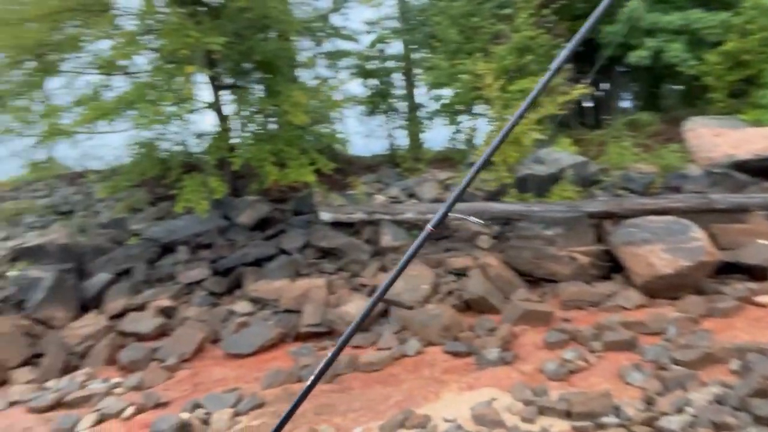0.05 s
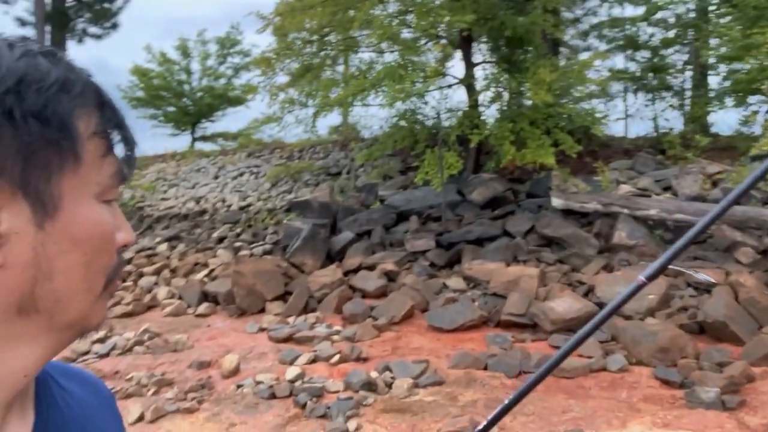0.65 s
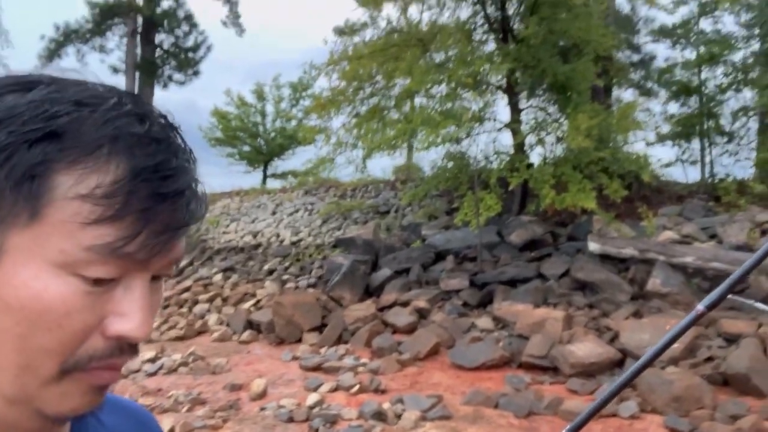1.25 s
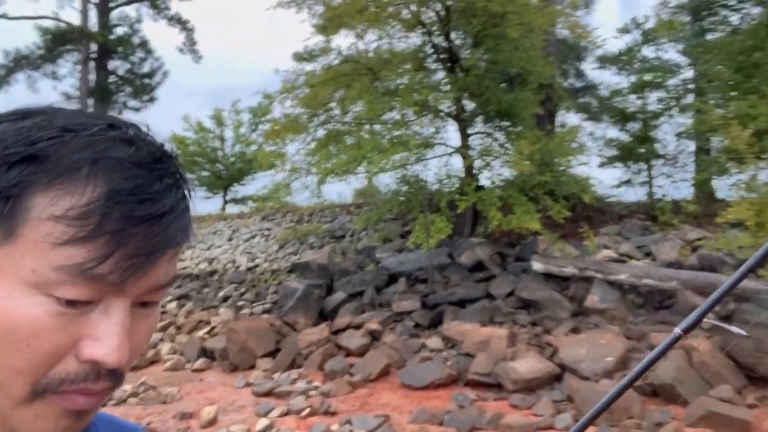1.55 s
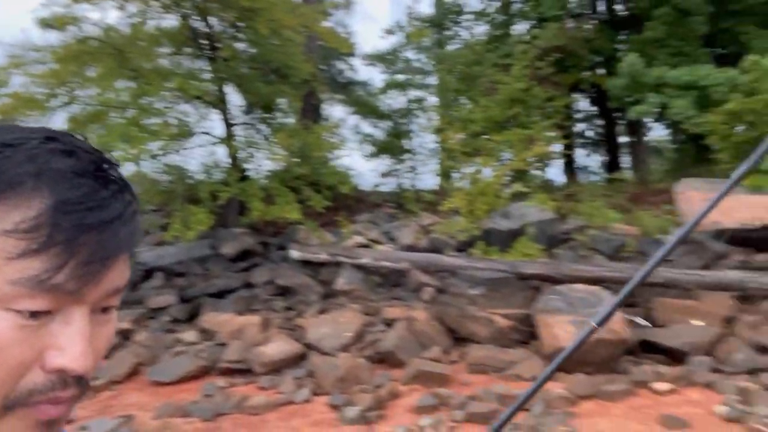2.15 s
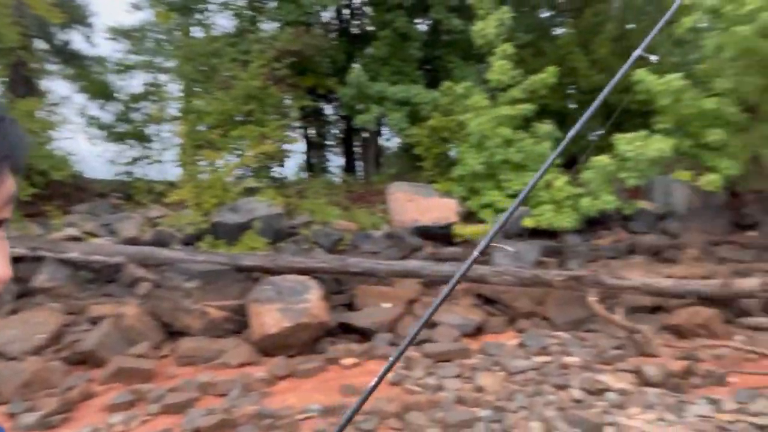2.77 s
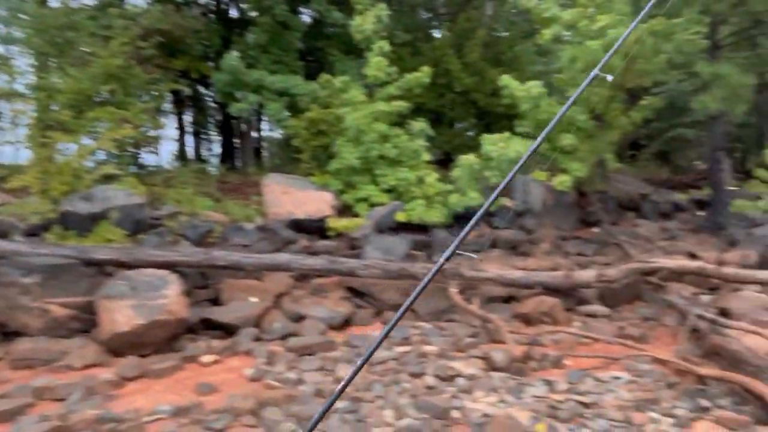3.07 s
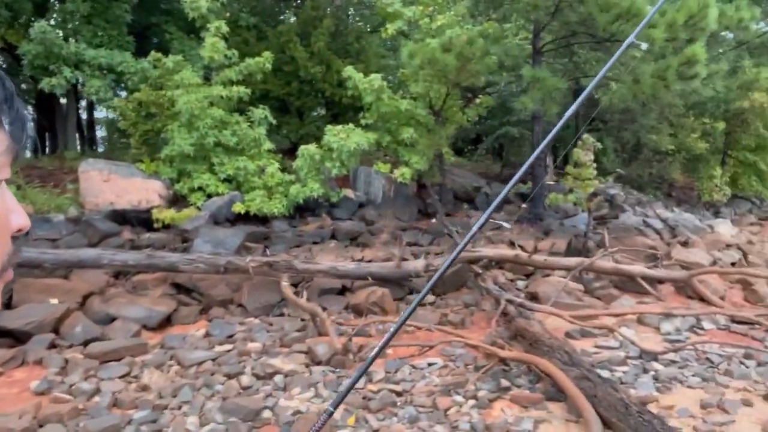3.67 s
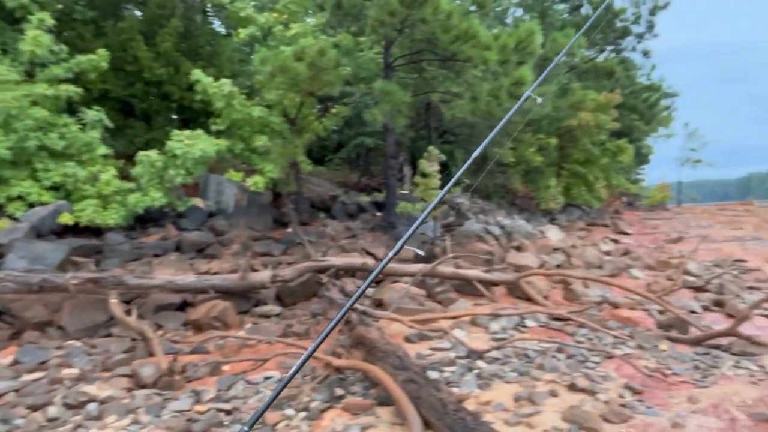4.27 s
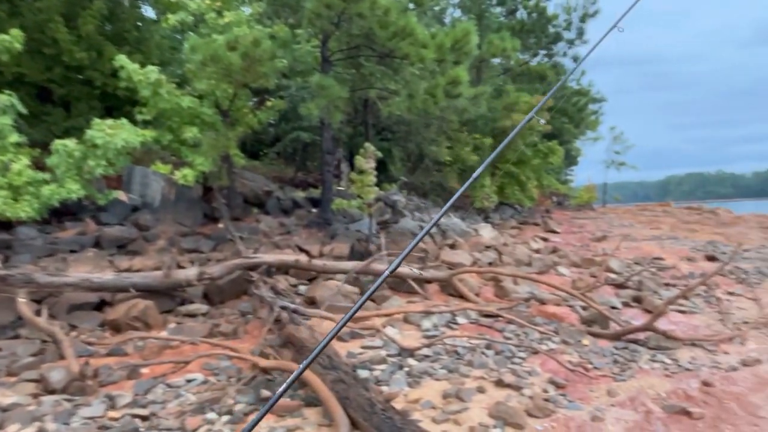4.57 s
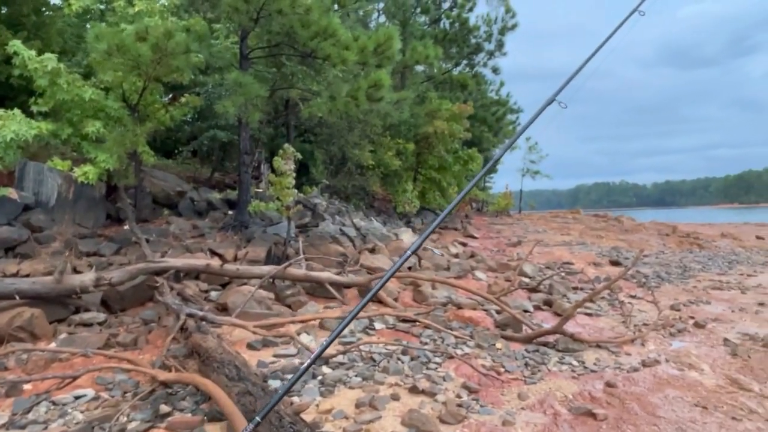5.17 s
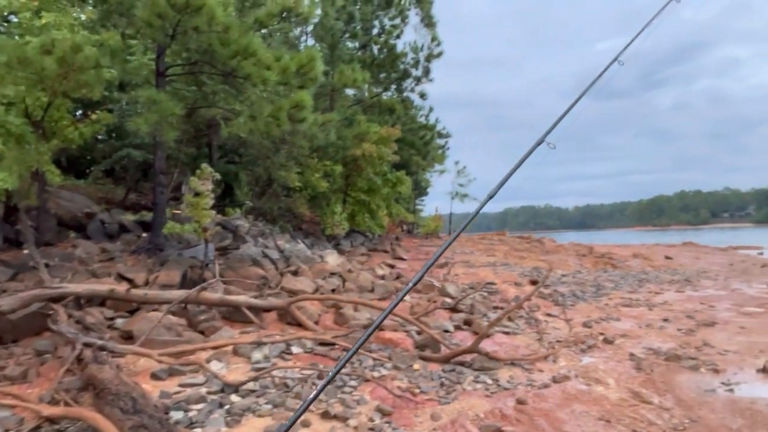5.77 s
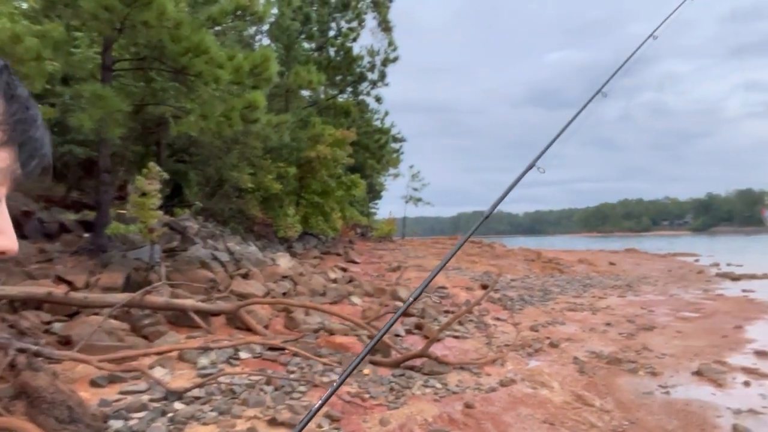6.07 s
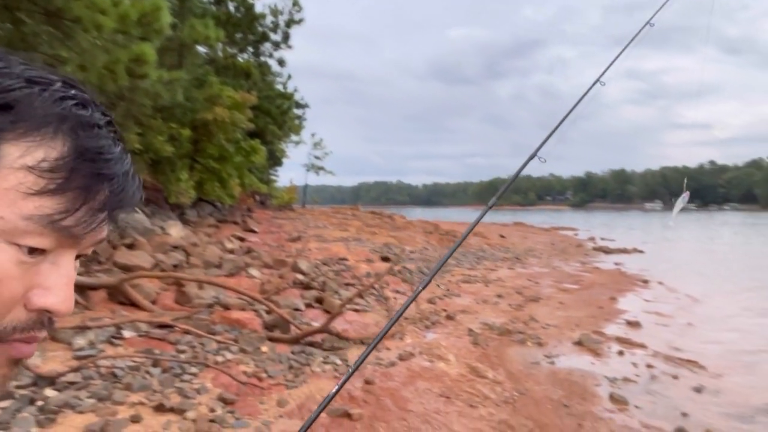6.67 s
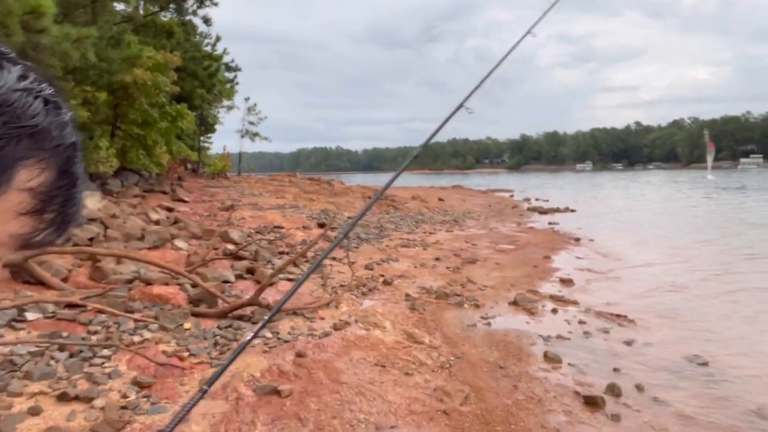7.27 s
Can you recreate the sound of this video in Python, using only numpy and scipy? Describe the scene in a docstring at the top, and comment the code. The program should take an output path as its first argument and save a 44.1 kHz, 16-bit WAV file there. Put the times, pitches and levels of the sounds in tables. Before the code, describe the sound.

Wind buffets the microphone as someone walks slowly over a stony lakeshore, while small waves gurgle and crickets trill.

```python
"""Slow steps crunch along a stony lakeshore: gravel and sand give way in many tiny impacts, and loose
stones clack with a short, damped ring. Wavelets gurgle at the edge as their bubbles resonate.
Two crickets trill by stridulation, a chorus behind them; their phase between the microphone's two
ports shifts as it slowly turns. Wind rumbles on the microphone over the low harmonic throb of a far
engine, probably a boat."""
import sys
import numpy as np
from scipy import signal
from scipy.fft import rfft, irfft, next_fast_len
from scipy.io import wavfile
from scipy.ndimage import uniform_filter1d, map_coordinates

SR = 44100
rng = np.random.default_rng(int(sys.argv[2]) if len(sys.argv) > 2 else 0)


def master_out(mix):
    """Clip the mix to full scale and print it as 16-bit PCM to the path in sys.argv[1]."""
    frames = np.transpose(np.atleast_2d(mix))
    ceiling = np.clip(frames, -1, 1)
    pcm = np.round(ceiling * 32767).astype(np.int16)
    wavfile.write(sys.argv[1], SR, pcm)


N = 322812
TOP_HZ = 15850
SIDE = np.array([[.5], [-.5]])  # splits a difference between left and right

# soles pressing into gravel: start_s, rise_s, length_s, gravel_db, grit_db
FOOTFALLS = [(0.339, 0.0031, 0.094, -42.5, -47.5), (0.444, 0.0089, 0.039, -47, -60),
             (0.522, 0.013, 0.06, -53.5, -53.5), (0.932, 0.0086, 0.063, -36, -39),
             (1.045, 0.0055, 0.14, -44, -48.5), (1.686, 0.021, 0.13, -40.5, -50.5),
             (1.87, 0.022, 0.06, -62, -48), (2.265, 0.0046, 0.062, -49, -59),
             (2.345, 0.017, 0.036, -36, -47), (2.471, 0.02, 0.059, -43, -60),
             (2.668, 0.028, 0.089, -53, -52.5), (3.077, 0.032, 0.098, -33.5, -43.5),
             (3.153, 0.026, 0.034, -37.5, -46), (3.762, 0.012, 0.1, -46.5, -53.5),
             (3.933, 0.009, 0.021, -39, -53), (4.391, 0.025, 0.062, -38, -45.5),
             (4.751, 0.019, 0.11, -49.5, -69), (5.419, 0.037, 0.051, -40, -34.5),
             (5.602, .005, 0.026, -44, -54.5), (6.683, 0.013, 0.074, -44.5, -58)]
# soles sliding on sand: start_s, length_s, level_db
SCUFFS = [(0.326, 0.031, -47), (0.461, 0.016, -36.5), (0.934, 0.17, -48.5), (1.724, 0.025, -34.5),
          (2.355, 0.023, -29.5), (3.07, 0.063, -38), (3.793, 0.027, -36.5), (3.916, 0.037, -43.5),
          (4.42, 0.016, -44), (4.653, 0.022, -42.5), (4.775, 0.021, -51), (5.517, 0.068, -39),
          (6.322, 0.035, -44), (6.415, 0.023, -33), (6.686, 0.046, -41.5)]
# spectra of coarse gravel and fine grit: frequency_hz, density_db
GRAVEL_SPECTRUM = [(200, 3), (450, -4), (750, 4.5), (1100, 7), (1700, 0), (2300, -6), (2900, -5),
                   (4200, -10), (6000, -3), (9000, -2), (16000, -103)]
GRIT_SPECTRUM = [(600, -14), (1600, -1.5), (2700, 5.5), (3800, 0.5), (6000, -12), (12000, -25)]
# spectrum of hissing sand, and of foam on the water: frequency_hz, density_db
HISS_SPECTRUM = [(1500, -24), (3500, -9), (5500, -5.5), (7500, 0), (8500, 0), (9500, -7), (12000, -9),
                 (14000, -5), (16000, -7)]
def steps():
    """Granular noise: under a sole, countless impacts merge into a crunch and friction into a hiss."""
    gravel, grit, sand = np.zeros((3, N))
    t = np.arange(SR // 2) / SR
    for start, rise, length, gravel_db, grit_db in FOOTFALLS:
        force = sole_force(t, rise, length)
        add(gravel, start, amp(gravel_db) * force)
        add(grit, start, amp(grit_db) * force)
    for start, length, db in SCUFFS:
        add(sand, start, amp(db) * sole_force(t, rise=.46 * length, length=length))
    clicks = amp(-6.5) * pebbles(centre_hz=1250, octaves=1, cycles=9, size_db=11, count=2600)
    coarse = spread(patchy(crackle(clump_db=3.6), depth_db=3), GRAVEL_SPECTRUM)
    fine = spread(crackle(clump_db=3.5), GRIT_SPECTRUM)
    chips = pebbles(centre_hz=2850, octaves=.45, cycles=13, size_db=12, count=2400)
    crunch = gravel * unit(coarse + clicks) + grit * unit(fine + chips)
    fits = unit(amp(1.4 * wobble(110)))  # the stones give way in fits and starts
    return fits * crunch + sand * spread(crackle(clump_db=3.5), HISS_SPECTRUM)


def sole_force(t, rise, length):
    """Loading and relaxation: the force builds up, holds and dies away as the foot settles."""
    return (1 - np.exp(-t / rise)) ** 2 / (1 + (t / length) ** 2.61)


def pebbles(centre_hz, octaves, cycles, size_db, count):
    """Damped oscillators: each struck pebble clicks at its own pitch, size and side; rms 1."""
    when, pitch, size, pan = np.hsplit(rng.random((count, 4)), 4)
    t = np.arange(400) / SR
    hz = np.minimum(centre_hz * 2 ** (octaves * (2 * pitch - 1)), TOP_HZ)
    envelope = amp(size_db * size ** 2 - 60 * t * hz / cycles) / np.sqrt(hz)
    return scatter(envelope * np.sin(2 * np.pi * hz * t), when, pan)


# grit snapping underfoot: start_s, level_db, pitch_hz
GRIT_SNAPS = [(0.485, -29, 8250), (.802, -29, 7600), (1.011, -22.5, 2640), (1.149, -13.5, 3140),
              (1.185, -24, 6500), (2.385, -22, 7640), (3.85, -33.5, 1480), (4.6607, -30, 2270),
              (5.176, -35, 4800), (5.432, -25, 9100), (6.437, -18.5, 6500)]
# small pebbles colliding: start_s, level_db, pitch_hz
PEBBLE_TICKS = [(1.3578, -36, 2610), (1.897, -38, 2500), (1.9644, -38, 2720), (2.252, -49, 4480),
                (2.2799, -33, 2650), (2.3845, -34, 2530), (3.857, -33, 2590), (3.984, -38, 2790),
                (4.0477, -38, 3050), (4.353, -35, 8700), (4.6474, -38, 2460), (4.658, -23, 1960),
                (4.6992, -38, 4840), (4.746, -33.5, 5330), (4.789, -38, 5140), (6.291, -31, 7970),
                (6.6917, -42, 4220), (6.8348, -38, 5100), (6.9435, -40, 5200), (7.0078, -35, 5100)]
# loose stones rocking against each other: start_s, level_db, pitch_hz, ring_time_ratio
STONE_CLACKS = [(.371, -29.5, 1060, 1.8), (0.466, -31, 564, 1.3), (.538, -33, 1070, 1.3),
                (.9445, -24, 1070, 1.5), (1.0096, -20, 1020, 1.9), (1.102, -25.5, 915, 1.4),
                (1.1495, -6, 1180, 0.49), (1.711, -31.5, 990, 1.6), (1.752, -30, 1110, 1.3),
                (2.194, -29, 860, 0.7), (3.194, -21, 1120, 1), (4.6611, -9, 960, 0.68),
                (4.6638, -14.5, 850, 1.05), (4.665, -23, 570, 1.24), (4.6674, -21.5, 903, 1.1),
                (4.671, -32, 710, 0.71), (5.1762, -13.5, 1020, 0.76), (5.2244, -24, 1150, 1.3),
                (5.615, -27, 920, 0.81), (6.716, -23.5, 690, .7)]
# modes of a stone on its bed: pitch_ratio, level_db, t60_s
STONE_MODES = [(.42, -20, 0.033), (.68, -8.5, 0.013), (1.001, 5.5, 0.0074), (1.22, -27, 0.0083)]
def stones():
    """Impact excitation: grit snaps in single pulses; pebbles and stones ring in short-lived modes."""
    impacts, clacks = np.zeros((2, N))
    t = np.arange(SR // 8) / SR
    decay = amp(-60 * t / .012)  # crumbs and pebbles fall 60 dB in 12 ms
    for start, db, hz in GRIT_SNAPS:
        pulse = 1.7 * np.sin(2 * np.pi * hz * t) * np.exp(-t * hz * 1.7)  # about one cycle
        crumbs = .21 * rng.standard_normal(len(t)) * decay
        add(impacts, start, amp(db) * (pulse + crumbs))
    for start, db, hz in PEBBLE_TICKS:
        partner_hz = hz * rng.uniform(.89, 1.28)  # both pebbles ring
        ring = np.sin(2 * np.pi * hz * t) + .42 * np.sin(2 * np.pi * partner_hz * t)
        add(impacts, start, amp(db) * decay * ring * (1 - np.exp(-t / .00074)))
    for start, db, hz, ring_time in STONE_CLACKS:
        ring = sum(amp(mode_db - 60 * t / (t60 * ring_time)) * np.sin(2 * np.pi * ratio * hz * t)
                   for ratio, mode_db, t60 in STONE_MODES)
        add(clacks, start, amp(db) * ring * (1 - np.exp(-t / .00064)) ** 2)
    sandy_bed = signal.butter(4, 1720, fs=SR, output="sos")  # damps the ring above 1720 Hz
    impacts += signal.sosfilt(sandy_bed, clacks)
    return impacts * amp(2 * SIDE) + amp(-14.5) * echoes(impacts)


# wavelets running up the stones: start_s, time_to_crest_s, wash_db, fizz_db
WAVELETS = [(-.2, 0.36, -55.5, -58.5), (.38, 0.16, -52, -54), (.68, 0.3, -52.5, -56),
            (.87, 0.057, -51.5, -64), (1.22, 0.26, -57.5, -62.5), (1.72, .2, -58, -60),
            (2.32, 0.26, -54.5, -58), (2.65, 0.72, -52, -65), (3.06, 0.92, -58, -75),
            (3.742, 0.22, -57.5, -64), (4.362, 0.27, -51, -59), (4.95, 0.44, -53, -60),
            (5.441, 0.23, -55, -71), (5.73, 0.16, -56.5, -63), (6.399, 0.14, -51.5, -55.5),
            (6.66, 0.28, -52, -56.5)]
def lapping():
    """Incoherent sources add in power: wash and fizz surge with each wavelet and drain more slowly."""
    t = np.arange(N) / SR
    wash_power, fizz_power = amp(-72) ** 2, amp(-69.5) ** 2  # calm water
    for start, crest, wash_db, fizz_db in WAVELETS:
        age = np.maximum(t - start, 0) / crest
        surge = (age * np.exp(1 - age)) ** 2
        wash_power += (amp(wash_db) * surge) ** 2
        fizz_power += (amp(fizz_db) * surge) ** 2
    ripple = amp(2.06 * wobble(14))
    return ripple * np.sqrt(wash_power), ripple * np.sqrt(fizz_power)


# spectrum of water draining through stones: frequency_hz, density_db
SLOSH_SPECTRUM = [(200, -28), (400, 5.5), (700, -4), (1050, -6), (1600, -8), (2300, -10), (3200, -13.5),
                  (5000, -18.5), (7000, -7), (10000, -44), (16000, -33)]
def water():
    """Air entrainment: the wash sloshes through the stones, full of small bubbles, with fizz on top."""
    wash, fizz = lapping()
    slosh = spread(patchy(crackle(clump_db=1.3), depth_db=3.2), SLOSH_SPECTRUM)
    foam = spread(crackle(clump_db=4), HISS_SPECTRUM)
    gurgle = amp(-7) * bubbles(centre_hz=1350, octaves=1.1, cycles=26, size_db=14, count=600)
    droplets = amp(-17) * bubbles(centre_hz=4200, octaves=.6, cycles=35, size_db=14, count=300)
    return wash * (slosh + gurgle + droplets) + fizz * foam


def bubble(t, hz, t60):
    """Bubble resonance: trapped air rings briefly, rising in pitch as it nears the surface."""
    glide = .94 + .22 * np.minimum(t / t60, 1.5)
    return np.sin(2 * np.pi * hz * t * glide) * amp(-60 * t / t60) * (1 - np.exp(-t * hz * .59))


def bubbles(centre_hz, octaves, cycles, size_db, count):
    """Independent resonators: a cloud of bubbles of random time, pitch, size and side; rms 1."""
    when, pitch, size, pan = np.hsplit(rng.random((count, 4)), 4)
    t = np.arange(1500) / SR
    hz = np.minimum(centre_hz * 2 ** (octaves * (2 * pitch - 1)), TOP_HZ)
    return scatter(bubble(t, hz, cycles / hz) * amp(size_db * size ** 2), when, pan)


# large bubbles in the lapping water: start_s, level_db, pitch_hz
PLOPS = [(0.743, -33.5, 1230), (0.994, -24.5, 1064), (1.246, -32, 1126), (1.56, -37, 810),
         (2.158, -42, 560), (2.23, -40.5, 2330), (2.516, -31, 1380), (3.178, -28, 1010), (3.2, -26, 1295),
         (3.305, -36, 563), (3.85, -30.5, 865), (4.053, -31, 1060), (4.385, -34, 630), (4.533, -33, 2000),
         (4.662, -23.5, 670), (5.685, -34, 1140), (5.739, -47, 1190), (5.763, -38, 1080),
         (5.787, -38, 1340), (5.815, -37, 2150), (5.851, -43, 530), (5.876, -43, 780), (5.941, -39, 576),
         (6.556, -43, 1650), (6.74, -34, 1280), (6.76, -29.5, 1094), (6.838, -38, 1260), (6.888, -29, 1850),
         (6.893, -32.5, 630), (6.931, -39.5, 2630), (6.958, -36, 540), (7.001, -27.5, 614),
         (7.03, -38, 754), (7.038, -33.5, 1800), (7.052, -41, 980), (7.073, -34, 1430), (7.108, -37.5, 770),
         (7.146, -36.5, 1920), (7.223, -48, 543), (7.268, -49, 533)]
def plops():
    """Fragmentation: an air pocket breaks into one loud resonating bubble and four fainter ones."""
    track, t = np.zeros(N), np.arange(SR // 8) / SR
    for start, db, hz in PLOPS:
        t60 = 27 / hz  # dies away in 27 cycles
        add(track, start, amp(db) * bubble(t, hz, t60))
        for late, pitch in rng.random((4, 2)):
            add(track, start + .028 * late, amp(db - 12) * bubble(t, hz * (.7 + pitch), t60 / 2))
    return track * amp(2 * SIDE) + amp(-9) * echoes(track)


# the near cricket: time_s, level_db, left_over_right_db, stroke_start_over_end_db
NEAR_CRICKET = [(0, -49.5, 2, 4), (.15, -58, 10, 0), (.4, -47, 3.5, 12), (.75, -46, -4, 8),
                (1.08, -44.5, 4.5, 2), (1.55, -51, -3, -5), (1.95, -62, 7, -6), (2.2, -50, 1, 0),
                (2.55, -46, 8, -5), (3.1, -53, 3.5, 0.5), (3.6, -54.5, -1, 7), (4.2, -59, 7, 3),
                (4.6, -52.5, 9.5, 1), (5.7, -51, 8.5, 2), (6.2, -53.5, 6, 2), (6.75, -56, 18.5, 10),
                (7.32, -56.5, 17, 6)]
# the lower cricket, which swells twice and fades: time_s, level_db
LOW_CRICKET = [(0, -67), (.6, -60), (1.05, -50), (1.6, -52), (2, -58), (2.3, -72), (3.1, -69), (3.5, -61),
               (3.75, -64), (4, -78)]
# direction of the crickets from the turning microphone: time_s, leftward_deg
BEARING = [(0, 12), (.35, -48), (.85, -36), (1.7, -36), (2.25, 10), (2.75, 27), (3.25, 58), (4.3, 66),
           (4.7, 88), (6, 114), (6.75, 164), (7.32, 178)]
def crickets():
    """Path difference: bearing sets the phase of two trills at the ports; echoes and chorus lie behind."""
    near_db, pan_db, tilt_db = curves(NEAR_CRICKET)
    low_db, = curves(LOW_CRICKET)
    bearing_deg, = curves(BEARING)
    near_lead_rad = 6.8 * np.sin(np.radians(bearing_deg))
    low_lead_rad = near_lead_rad - .75  # the two sit a little apart
    near = amp(near_db) * trill(stroke_hz=44.46, top_hz=7110, fall_hz=520, duty=.6, tilt_db=tilt_db)
    low = amp(low_db) * trill(stroke_hz=47, top_hz=6535, fall_hz=490, duty=.62, tilt_db=2)
    direct = np.real(near * placed(pan_db, near_lead_rad) + low * placed(8, low_lead_rad))
    octave = wing_octave(near, bearing_deg) * amp(SIDE * pan_db)
    trees = chorus() + amp(-12) * echoes(np.real(near + low))
    return direct + octave + trees * amp(6 * SIDE)


def trill(stroke_hz, top_hz, fall_hz, duty, tilt_db=0):
    """Stridulation: each wing stroke draws the same teeth, a whistle that holds, then drops; complex."""
    stroke = np.cumsum(stroke_hz * (1 + .001 * wobble(3.1))) / SR % 1
    progress = np.minimum(stroke / duty, 1)
    cycles = duty / stroke_hz * (top_hz * progress - fall_hz * progress ** 3 / 3)
    rasp_rad = .25 * wobble(330) + .8 * wobble(45)
    level_db = tilt_db * (.5 - progress) + 1.1 * wobble(40) + 1.6 * wobble(450)
    swell = unit(np.sin(np.pi * progress) ** .8 * amp(level_db))
    return np.sqrt(2) * swell * np.exp(1j * (2 * np.pi * cycles + rasp_rad))


def wing_octave(song, bearing_deg, mode_hz=14200, width_hz=350):
    """Resonance: a wing mode lets out a faint second harmonic, picked up mostly in a narrow beam."""
    beam = amp(-31) + amp(-16) * np.exp(-((bearing_deg - 24) / 26) ** 2)
    doubled = np.real(song * np.exp(1j * np.angle(song)))
    overtone = filtered(doubled, lambda hz: np.exp(-((hz - mode_hz) / width_hz) ** 2))
    return beam * (.6 * overtone + .8 * echoes(overtone * amp(3 * wobble(700))))


# wind gusts: crest_s, level_db, half_width_s
GUSTS = [(.24, -38, 0.095), (.57, -33.5, 0.1), (1.12, -33, 0.11), (1.5, -41.5, 0.14), (1.9, -35.5, 0.23),
         (2.71, -34, 0.062), (3.15, -38.5, 0.36), (3.75, -34.5, 0.038), (4.202, -41.5, 0.27),
         (4.802, -38, 0.039), (5.65, -36.5, 0.57), (6.15, -36.5, 0.13), (6.798, -37, 0.52)]
# spectrum of the wind rumble, with an engine-like hum near 172 Hz: frequency_hz, density_db
RUMBLE_AND_HUM_SPECTRUM = [(15, -64), (28, -35), (40, -18.5), (55, 0), (80, -3), (110, -9), (140, -16.5),
                           (172, -9.5), (200, -20.5), (300, -22), (450, -35), (900, -65)]
def wind(breeze_db=-39.5):
    """Turbulent pressure rumbles on the microphone; each gust adds its power to a steady breeze."""
    t = np.arange(N) / SR
    gust_power = sum(amp(db) ** 2 * np.exp(-((t - crest) / width) ** 2) for crest, db, width in GUSTS)
    rumble_and_hum = spread(rng.standard_normal((2, N)), RUMBLE_AND_HUM_SPECTRUM)
    return np.sqrt(amp(breeze_db) ** 2 + gust_power) * rumble_and_hum


# partials of the engine: turning_rate_multiple, level_db
ENGINE_PARTIALS = [(2, -52), (3, -46), (4, -46), (5, -42.5), (6, -54), (7, -63), (8, -61.5), (9, -57),
                   (10, -62.5), (11.1, -60)]
def engine(turning_hz=29.9):
    """Periodic excitation: one exhaust pulse a turn; its partials fade in and out over the water."""
    turns = np.cumsum(turning_hz * (1 + .002024 * wobble(2.057))) / SR
    throb = np.zeros(N)
    for multiple, db in ENGINE_PARTIALS:
        fading = np.sqrt(2) * amp(db + 2.8 * wobble(3.2))
        throb -= fading * np.cos(2 * np.pi * multiple * turns + .91 * wobble(5))
    return throb


# rise and fall of water further along the shore: time_s, level_db
FAR_WATER_LEVEL = [(0, -62), (1.4, -62), (2.15, -58.5), (2.6, -58.5), (5.8, -57.5), (6.2, -60), (6.7, -56),
                   (7.32, -62)]
# its spectrum: frequency_hz, density_db
FAR_WATER_SPECTRUM = [(200, -15), (400, 0), (700, -2), (1050, -3), (1600, -8), (2500, -15), (5000, -24),
                      (8000, -19), (10500, -47), (14000, -28), (16000, -30)]
def far_water():
    """Superposition: distant lapping merges into a dull, even noise that slowly rises and falls."""
    level_db, = curves(FAR_WATER_LEVEL)
    swell = amp(level_db + 1.3 * wobble(5))
    return swell * spread(patchy(crackle(clump_db=1), depth_db=2.5), FAR_WATER_SPECTRUM)


# spectrum of the massed crickets: frequency_hz, density_db
CHORUS_SPECTRUM = [(4500, -22), (5600, -1), (6050, 8), (6250, 8), (6480, 24), (6650, 22), (7000, 4),
                   (7200, 14), (7500, -100)]
# single crickets deeper in the trees: stroke_rate_hz, top_pitch_hz
FAR_CRICKETS = [(43.2, 6560), (46.1, 6530), (48.4, 6850)]
def chorus():
    """Incoherent summation: many far crickets blur into a noise band, with three faint trills in it."""
    swell = amp(-60 + 1.6 * wobble(1.46))
    band = filtered(rng.standard_normal((2, N)), lambda hz: amp(along(CHORUS_SPECTRUM, hz)))
    voices = swell * unit(band)
    for stroke_hz, top_hz in FAR_CRICKETS:
        voice = amp(-67 + 2.2 * wobble(1.34)) * np.real(trill(stroke_hz, top_hz, fall_hz=400, duty=.6))
        voices += .5 * (voice + echoes(voice))
    return voices


# reverberation time of the bank and trees: frequency_hz, t60_s
BANK_DECAY = [(200, 0.077), (2000, 0.13), (10000, 0.029)]
def echoes(x):
    """Diffuse reflection: bank and trees return an exponentially decaying tail on each side."""
    hz, t, noise = signal.stft(rng.standard_normal((2, SR // 3)), SR, nperseg=256)
    tail = signal.istft(noise * amp(-60 * t / along(BANK_DECAY, hz)[:, None]), SR, nperseg=256)[1]
    return signal.fftconvolve(x[None], tail / np.linalg.norm(tail[0]), axes=1)[:, :N]


# left-right level difference: frequency_hz, left_over_right_db
STEREO_BALANCE = [(300, 0), (700, 1), (1300, 0), (2200, -2.5), (4200, -6.5), (6000, -2), (8300, 4),
                  (11000, 2), (14000, 0)]
# left-right phase difference: frequency_hz, left_lead_rad
STEREO_PHASE = [(60, .05), (150, .4), (340, .7), (600, .8), (1200, .3), (2600, -.4), (3800, 0), (5300, 1.6),
                (8200, 1.9), (9700, 3.1), (12300, 3.2), (14000, 4.2), (15800, 5.5)]
def stereo_image(x):
    """Left-right level and phase differences: the hiss is very wide, in opposite phase, at 10-12 kHz."""
    return filtered(x, lambda hz: placed(along(STEREO_BALANCE, hz), along(STEREO_PHASE, hz)))


def placed(pan_db, lead_rad):
    """Level and phase differences, left over right, as a pair of complex gains."""
    return amp(SIDE * pan_db) * np.exp(1j * SIDE * lead_rad)


# left-right likeness: frequency_hz, coherence
STEREO_COHERENCE = [(40, .99), (110, .94), (250, .55), (500, .55), (1000, .65), (2500, .45), (5000, .55),
                    (8500, .75), (10000, .96), (12000, .96), (15000, .75)]
def spread(pair, spectrum):
    """Partial coherence: two unrelated signals become mid and side of one coloured sound; rms 1."""
    def response(hz):
        angle = np.arccos(np.clip(along(STEREO_COHERENCE, hz), -1, 1)) / 2
        return amp(along(spectrum, hz)) * np.array([np.cos(angle), np.sin(angle)])
    mid, side = filtered(pair, response)
    return unit(np.array([mid + side, mid - side]))


def crackle(clump_db):
    """Random amplitude modulation: two noises come in clumps of a millisecond or so."""
    return unit(rng.standard_normal((2, N)) * amp(clump_db * (wobble(900) + .59 * wobble(90))))


def patchy(pair, depth_db):
    """Cavity resonance: shifting gaps between water and stones briefly lift and dull narrow bands."""
    bands = signal.stft(pair, nperseg=512)[2]
    field = rng.standard_normal(bands.shape[1:])
    field = uniform_filter1d(uniform_filter1d(field, size=4, axis=0), size=4, axis=1)
    return signal.istft(bands * amp(depth_db * unit(field)), nperseg=512)[1][:, :N]


def scatter(rings, when, pan):
    """Superposition of short sounds strewn over time and from right to left (both 0-1); rms 1."""
    at = (when * N).astype(int) + np.arange(rings.shape[1])
    gains = [amp(sign * 12 * (pan - .5)) for sign in (1, -1)]
    return unit(np.array([np.bincount(at.ravel(), (rings * g).ravel(), N)[:N] for g in gains]))


def amp(db):
    """Decibels to gain."""
    return 10 ** (np.asarray(db) / 20)


def unit(x):
    """Normalisation to rms 1."""
    return x / np.sqrt(np.mean(x ** 2) + 1e-20)


def along(points, hz):
    """Interpolation of (frequency_hz, value) points on a logarithmic axis."""
    knots_hz, values = np.transpose(points)
    return np.interp(np.log(hz + 1), np.log(knots_hz + 1), values)


def curves(rows):
    """Linear interpolation: one value per sample for each column after the time."""
    times, *columns = np.transpose(rows)
    return [np.interp(np.arange(N) / SR, times, column) for column in columns]


def wobble(rate_hz):
    """A smooth random curve through rate_hz knots a second."""
    return map_coordinates(rng.standard_normal(4096), [np.arange(N) * rate_hz / SR], mode="wrap")


def filtered(x, response):
    """Linear filtering: the spectrum of x times a complex response of frequency."""
    size = next_fast_len(N + 8192)
    return irfft(rfft(x, size) * response(np.fft.rfftfreq(size, 1 / SR)), size)[..., :N]


def add(track, start_s, sound):
    """Mix a sound into a track at a time."""
    part = track[max(round(start_s * SR), 0):][:len(sound)]
    part += sound[:len(part)]


def scene():
    """Superposition: wind and engine lean right, the crickets left; water and steps lie between."""
    rumble = (wind() + engine()) * amp(-2.6 * SIDE)
    lake = water() + plops() + far_water()
    return stereo_image(rumble + lake + steps() + stones()) + crickets()


def record(dry):
    """Band limiting: nothing above TOP_HZ is kept."""
    return filtered(dry, lambda hz: hz < TOP_HZ)


dry = scene()
out = record(dry)
master_out(out)
```